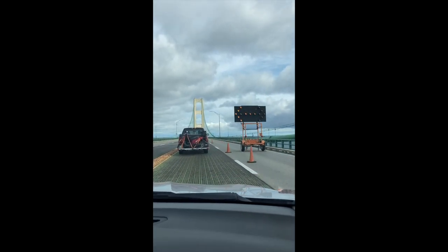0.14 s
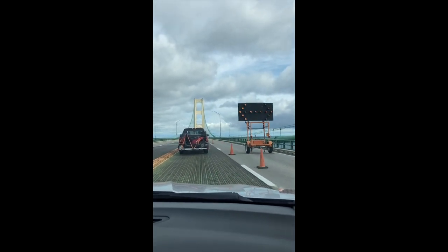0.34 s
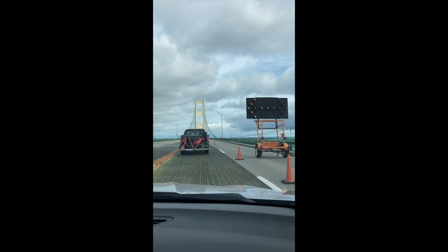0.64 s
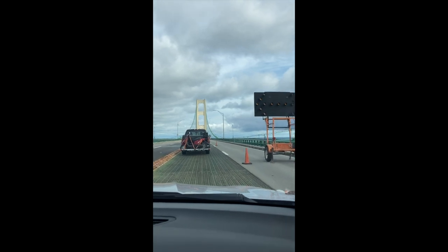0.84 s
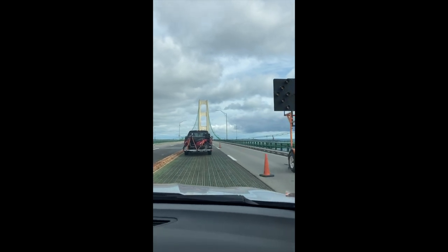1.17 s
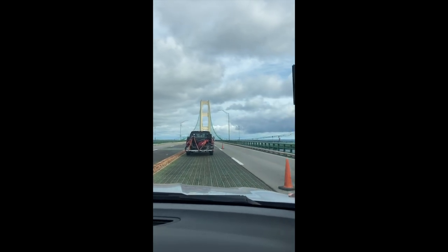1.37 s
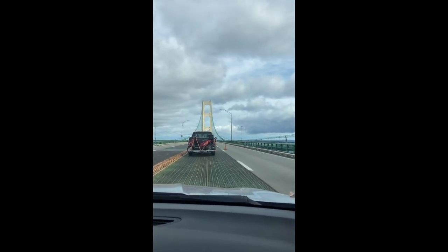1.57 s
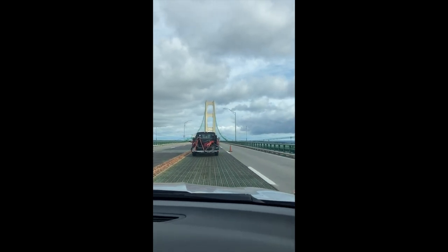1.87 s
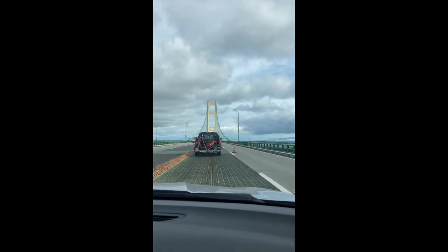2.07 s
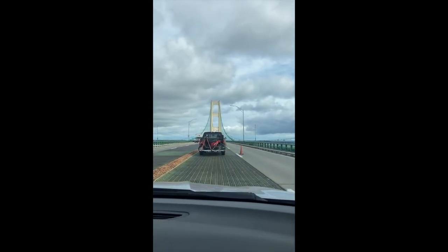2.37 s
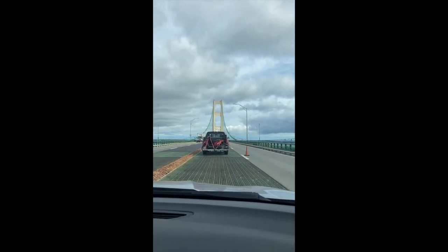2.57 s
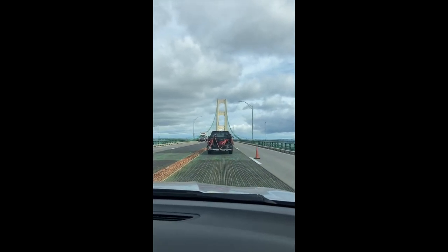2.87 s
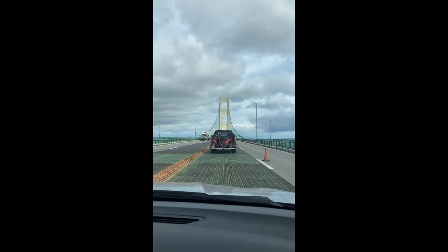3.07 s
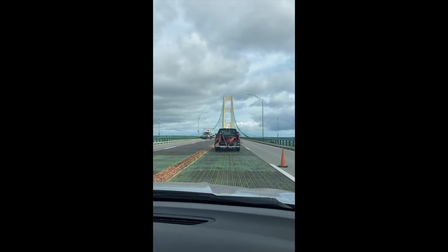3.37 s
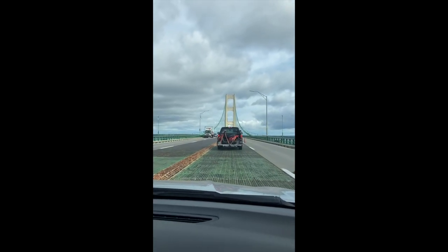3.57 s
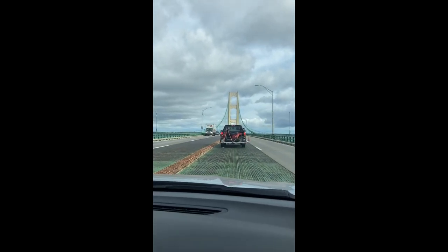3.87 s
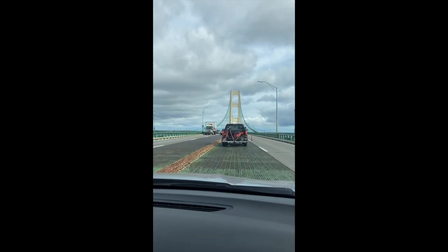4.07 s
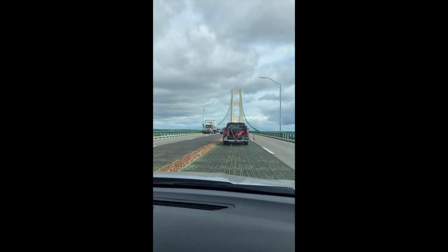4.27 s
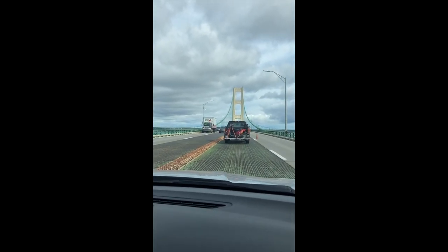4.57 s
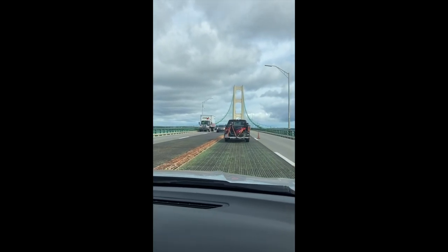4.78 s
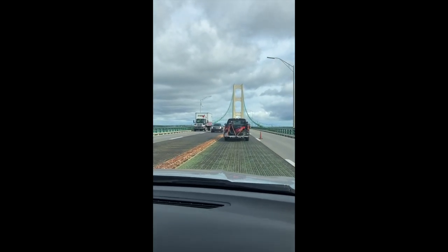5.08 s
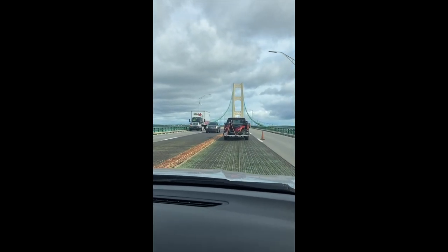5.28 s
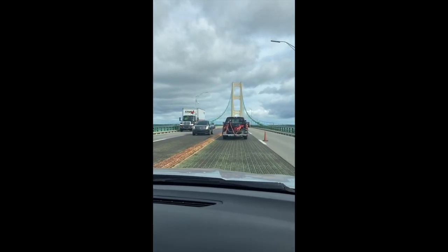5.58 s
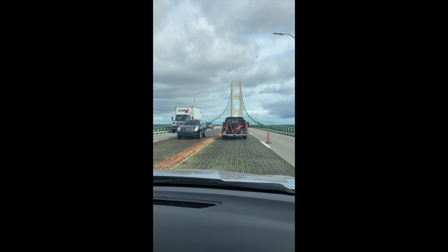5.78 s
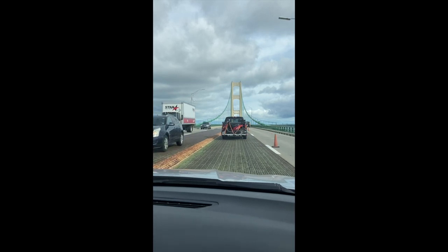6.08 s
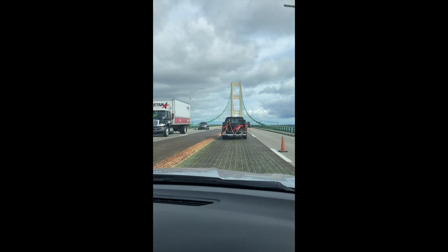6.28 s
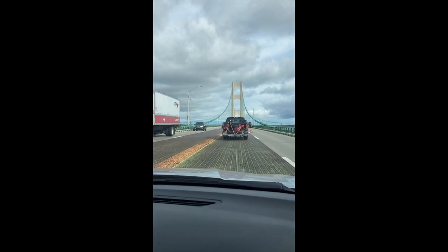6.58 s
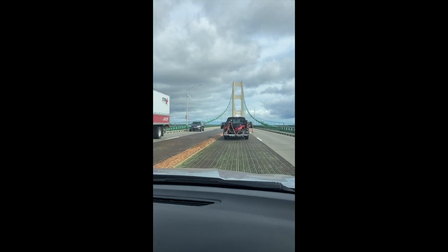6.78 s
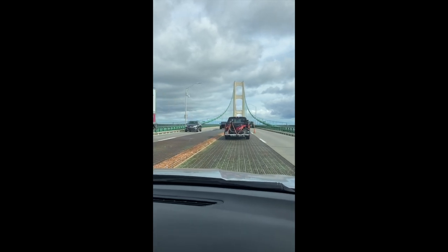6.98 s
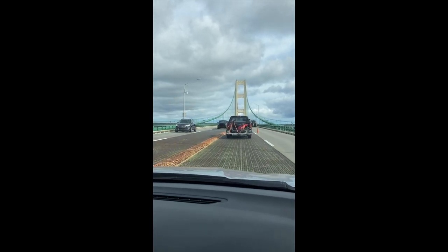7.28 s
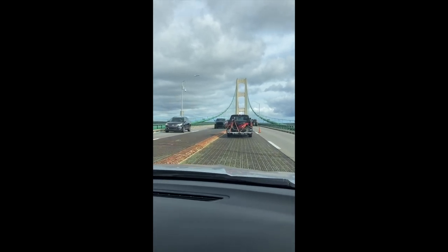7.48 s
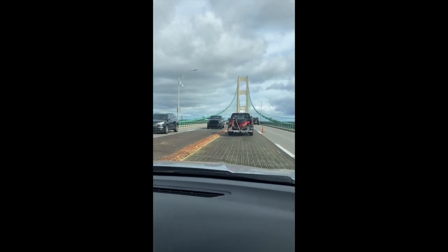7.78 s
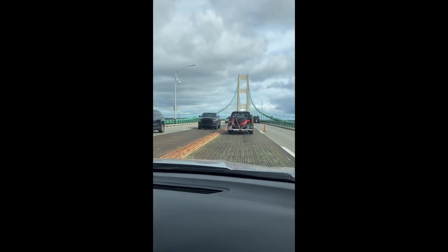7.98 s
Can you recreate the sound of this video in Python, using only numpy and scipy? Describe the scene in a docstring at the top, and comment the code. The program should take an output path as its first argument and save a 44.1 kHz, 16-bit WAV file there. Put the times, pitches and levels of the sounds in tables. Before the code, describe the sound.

A close cabin microphone catches a dominant bass drone from tires crossing a bridge's metal grid, wavering in strength and edging upward in pitch. Irregular joints cut small gaps followed by dull low thuds. Trim clicks sharply near the middle, and a very faint dash motor whine enters around four seconds. Later, oncoming traffic rushes by with a rough mid-range roar, while the hum continues to the end.

```python
"""A steady hum inside a car on an open steel grid deck: the tyres strike cross bars, so pitch follows speed.
Joints in the deck break the hum and thump; low noise booms in the cabin and tyre roar comes dulled.
Door seals hiss, trim ticks and rustles, and a small dash motor comes in as a steady whine.
Late on, oncoming traffic swells past as roar and rough tones. Harmonic sines make the hum and filtered
noise nearly all the rest."""
import sys
import numpy as np
from scipy import signal
from scipy.fft import rfft, irfft, next_fast_len
from scipy.io import wavfile

SR = 44100
rng = np.random.default_rng(int(sys.argv[2]) if len(sys.argv) > 2 else 0)


def unload_audio(sound):
    """Save the sound as a 16-bit wav file, at the path given as the first command line argument."""
    columns = np.transpose(np.atleast_2d(sound))
    # keep every value between -1 and 1, then stretch to whole-number steps
    steps = np.round(np.clip(columns, -1, 1) * 32767)
    wavfile.write(sys.argv[1], SR, steps.astype(np.int16))


N = 358974


def amp(db):
    """Decibel law: 20 dB is a tenfold amplitude."""
    return 10 ** (np.asarray(db) / 20)


def rms_one(x):
    """Normalisation of mean power: scale to rms 1."""
    return x / np.sqrt(np.mean(x ** 2) + 1e-20)


def in_time(rows):
    """Linear interpolation: each column of a curve table, one value a sample."""
    s, *columns = np.transpose(rows)
    return [np.interp(np.arange(N) / SR, s, c) for c in columns]


def over_log_hz(points, hz, **outside):
    """Interpolation on a log-frequency axis, as pitch is heard."""
    point_hz, values = np.transpose(points)
    return np.interp(np.log(hz), np.log(point_hz), values, **outside)


def drift(rate):
    """Low-passed noise: a random wander of rms 1, its double pole at rate Hz."""
    step = 40   # samples between drawn values
    r = np.exp(-2 * np.pi * rate * step / SR)
    white = rng.standard_normal(N // step + 2002)
    slow = signal.lfilter([1], [1, -2 * r, r * r], white)[2000:]   # drop the run-in
    return np.interp(np.arange(N) / step, np.arange(len(slow)), rms_one(slow))


def resonate(x, hz, width):
    """Two-pole resonance, gain 1 on top; width in Hz."""
    r = np.exp(-np.pi * width / SR)
    feedback = [1, -2 * r * np.cos(2 * np.pi * hz / SR), r * r]
    return signal.lfilter([(1 - r * r) / 2, 0, (r * r - 1) / 2], feedback, x)


def spread(gain):
    """Partial coherence: stereo noise of a given gain per frequency, summed from mid and side; rms 1."""
    # Left-right coherence. Each row: frequency in Hz, likeness from 0 to 1.
    likeness = [(60, .995), (125, .99), (200, .98), (290, .88), (400, .8), (560, .4), (750, .3), (1300, .1),
                (2400, .2), (4400, .12), (6000, .2), (8100, .85), (15000, .82)]
    # Stereo balance. Each row: frequency in Hz, left minus right in dB.
    balance = [(60, 1), (125, 1.1), (250, .4), (500, .2), (1000, -.7), (2000, .8), (8000, .5)]
    size = next_fast_len(N)
    hz = np.maximum(np.arange(size // 2 + 1) * SR / size, 1)
    alike = np.clip(over_log_hz(likeness, hz), 0, 1)
    lean_db = over_log_hz(balance, hz) / 2 * [[1], [-1]]
    mid, side = rfft(rng.standard_normal((2, size)))
    both = np.sqrt(1 + alike) * mid + np.sqrt(1 - alike) * side * [[1], [-1]]
    return rms_one(irfft(both * gain(hz) * amp(lean_db), size)[:, :N])


def coloured(spectrum):
    """Spectral shaping: stereo noise with a drawn spectrum, silent outside it; rms 1."""
    return spread(lambda hz: amp(over_log_hz(spectrum, hz, left=-150, right=-150)))


def mode_noise(hz, width):
    """Modal response: stereo noise through one resonance, width in Hz at half its peak gain; rms 1."""
    return spread(lambda f: 1 / (1 + ((f - hz) / (width / 2)) ** 2))


def patchy(x, edges_hz, patchy_db):
    """Band-wise modulation: each band surges on its own, slowly and in flickers, and partly with the others."""
    size = next_fast_len(N)
    together, out, spectrum = drift(8.1), 0, rfft(x, size)
    hz = np.arange(spectrum.shape[1]) * SR / size
    for low, high in zip(edges_hz, edges_hz[1:]):
        part = irfft(spectrum * ((hz >= low) & (hz < high)), size)[:, :N]
        surge = .6 * together + .6 * drift(1.5) + .8 * drift(9)
        out = out + part * amp(patchy_db * surge)
    return out


def joints(column, half_s, late_s):
    """Transient disturbance: a bell-shaped change in dB at every joint, half_s wide on each side to 1/e."""
    # Joints between deck panels. Each row: time in seconds, hum lost in dB, low rumble gained in dB.
    panel_joints = np.array([(.19, 0.5, 0), (.43, 11.5, 1.5), (.7, 0, 5.5), (1.67, 15.5, 8), (2.06, 6, 7),
                             (2.771, 16.5, 3.5), (2.89, 19, 3.5), (3.04, 5.5, 3), (3.27, 4.5, 6),
                             (4.07, 5.5, 2), (4.34, 16.5, 3), (5.11, 3, 3), (5.43, 6, 6), (5.701, 4, 4),
                             (5.88, 10.5, 1.5), (6.17, 4, 0.5), (6.509, 4.5, 4), (7.031, 9.5, 6.5),
                             (7.33, 4.5, 4), (7.46, 1.5, 2), (7.859, 9, 2)])
    t = np.arange(0, N + 64, 64) / SR
    bells = np.exp(-((t - panel_joints[:, :1] - late_s) / half_s) ** 2)
    return np.interp(np.arange(N) / SR, t, panel_joints[:, column] @ bells)


def grid_hum():
    """Periodic impacts give a harmonic tone at the bar rate; it swells, dips and wanders in phase."""
    # Speed over the deck. Each row: time in seconds, bars struck per second.
    speed = [(0.0, 113), (0.43, 112.7), (0.54, 113.7), (0.84, 115.2), (1.45, 119.4), (1.68, 120.4),
             (1.97, 122), (2.04, 124.4), (2.7, 125.8), (2.79, 128), (5.3, 129), (5.69, 127.7),
             (6.89, 125.7), (6.96, 127.3), (7.82, 127.3), (7.93, 132), (8.09, 127), (8.14, 131.0)]
    # Hum level as the four tyres drift in and out of step. Each row: time in seconds, level in dB.
    hum_level = [(0, -15), (.33, -16.5), (.5, -19.5), (.8, -12.5), (1.1, -13.5), (1.55, -17.5),
                 (1.9, -13.5), (2.27, -13.5), (2.45, -17.5), (2.65, -16), (2.95, -17), (3.25, -16.5),
                 (3.48, -13), (3.9, -15), (4.3, -17), (4.6, -13.5), (5.0, -16), (5.6, -13), (5.8, -14.5),
                 (5.93, -21), (6.4, -15.5), (6.6, -16), (6.9, -11.5), (7.05, -19.5), (7.2, -17.5),
                 (7.4, -19.5), (7.75, -16), (8.14, -15)]
    # Octave, strong at first while it meets a floor pan mode. Each row: time in seconds, level in dB.
    octave_level = [(0, -31), (.09, -29.5), (.24, -31), (.34, -36), (.45, -28), (.52, -31), (.62, -37),
                    (.68, -35), (.75, -29.5), (.83, -36), (.93, -34.5), (1.08, -39), (1.2, -52), (1.5, -48),
                    (1.75, -38), (2.3, -44), (2.65, -39.5), (3.4, -48), (3.9, -50), (4.1, -39),
                    (4.3, -51.5), (4.6, -37.5), (4.9, -50.5), (5.5, -44.5), (5.9, -38.5), (6.5, -39),
                    (7.3, -44.5), (8.14, -45.5)]
    # Higher harmonics. Each row: time in seconds, third harmonic in dB, fourth harmonic in dB.
    overtones = [(0, -50, -54), (.3, -46, -49), (.55, -52, -55), (1, -51.5, -53.5), (2, -53, -52),
                 (3, -52.5, -54), (4, -51, -54.5), (5, -53, -54.5), (5.5, -52, -53), (5.9, -52, -47),
                 (6.3, -52, -51), (7, -49.5, -55), (8.14, -50, -59)]
    # Where the hum seems to lie. Each row: time in seconds, left lead of the fundamental in radians,
    # left minus right in dB.
    hum_side = [(0, -.05, 1.1), (.75, .03, 1.2), (1.75, -.01, 1.6), (2.25, -.07, 1), (2.75, -.05, .7),
                (3.25, -.07, .5), (3.75, -.06, .9), (4.25, -.1, 1.5), (4.75, -.07, 1.5), (5.75, -.02, .7),
                (6.25, -.06, .9), (6.75, -.01, 1.3), (7.25, -.09, .8), (8.14, -.02, .8)]
    rate, = in_time(speed)
    phase = 2 * np.pi * np.cumsum(rate) / SR + .14 * drift(6)
    lead, lean_db = in_time(hum_side)
    lag = np.array([[.5], [-.5]]) * lead   # the two sides hear it a little apart
    hum_db = in_time(hum_level)[0] - joints(column=1, half_s=.027, late_s=0)
    out = amp(hum_db + .57 * drift(22)) * np.sin(phase + lag)
    second = np.sin(2 * phase + .6 * drift(4) + 3 * lag)
    out += amp(in_time(octave_level)[0] + 1.2 * drift(11)) * second
    for k, db in zip((3, 4), in_time(overtones)):
        harmonic = np.sin(k * phase + 1.1 * drift(5) + k * lag)
        out += amp(db + 3 * drift(3)) * harmonic
    return np.sqrt(2) * out * amp(lean_db * [[.5], [-.5]])   # root 2: a sine of rms 1


def road():
    """Broadband rolling noise: rumble, roar and tread noise of the deck, lifted by thumps at the joints."""
    # Spectra of rumble, roar and tread noise through the glass.
    # Each row: frequency in Hz, relative level per Hz in dB.
    rumble_spectrum = [(18, -39.5), (28, -19), (38, -4), (50, 2), (64, -1.5), (85, -2.5), (102, -9.5),
                       (127, -6), (145, -11.5), (170, -20), (230, -34.5), (400, -63)]
    roar_spectrum = [(110, -19.5), (160, 2), (215, -5), (260, -7.5), (310, -11), (390, -16), (460, -14),
                     (560, -13), (620, -18), (700, -22.5), (800, -35.5), (1000, -51)]
    tread_spectrum = [(600, -17.5), (800, -1), (1000, -4), (1380, -7), (1500, -10.5), (2300, -43.5)]
    # Road level. Each row: time in seconds, rumble in dB, roar in dB.
    deck_level = [(0, -22.5, -34.5), (1.0, -22.5, -34.5), (1.8, -20, -34.5), (2.3, -24, -35),
                  (3.0, -22, -35), (3.6, -24, -36.5), (4.4, -20, -35.5), (5.3, -24, -36), (6.3, -24, -34),
                  (6.6, -23, -32), (7.1, -20.5, -35.5), (8.14, -20.5, -34)]
    # Tread noise level. Each row: time in seconds, level in dB.
    tread_level = [(0, -60.5), (1.0, -60.5), (2.4, -61), (3.6, -60), (4.4, -57.5), (5.0, -58), (5.4, -61),
                   (6.0, -62), (6.9, -60.5), (7.3, -55.5), (8.14, -56.5)]
    thump_top_hz, roar_share = 94.5, .2   # top of the lifted rumble; share of the thump's dB given to the roar
    rumble_db, roar_db = in_time(deck_level)
    rumble = amp(rumble_db) * coloured(rumble_spectrum)
    deep = signal.sosfiltfilt(signal.butter(4, thump_top_hz, fs=SR, output="sos"), rumble)
    thump_db = joints(column=2, half_s=.043, late_s=.056)   # the thump follows the gap in the hum
    rumble += deep * (amp(thump_db) - 1)
    roar = patchy(coloured(roar_spectrum), [0, 190, 300, 420, 600, 1100], patchy_db=1.1)
    roar_db = roar_db + roar_share * (thump_db - thump_db.mean())
    tread = patchy(coloured(tread_spectrum), [500, 1100, 1500, 2500], patchy_db=1.7)
    return rumble + amp(roar_db) * roar + amp(in_time(tread_level)[0]) * tread


def cabin_modes():
    """Modal resonance: noise stands out in bands at the modes of the cabin, its glass and its trim."""
    # Panel and air modes, then faint resonances of glass and trim.
    # Each row: frequency in Hz, width in Hz, mid level in dB.
    cabin = [(51, 6.7, -37.5), (81.2, 13, -29), (91.2, 21, -26), (164, 39, -41.5), (207.4, 6, -43),
             (218, 24, -46), (340.5, 27, -49), (512, 44, -51), (1347, 90, -70.5)]
    glass = [(1741, 12, -78), (1830, 90, -78), (2030, 90, -81), (2310, 100, -85), (2725, 30, -88),
             (2860, 70, -87), (3256, 70, -92)]
    out = np.zeros((2, N))
    for hz, width, db in cabin + glass:
        out += amp(db + 1.2 * drift(2.5)) * mode_noise(hz, width)
    return out


def panel_buzz():
    """Single-mode panel resonance: a narrow band of noise, stronger in the first half."""
    # Buzz level. Each row: time in seconds, level in dB.
    panel_level = [(0, -46.5), (1.0, -49), (2.2, -45), (4.4, -54.5), (6.4, -52), (8.14, -56)]
    return amp(in_time(panel_level)[0] + 1.2 * drift(3)) * mode_noise(hz=462, width=34)


def seal_hiss():
    """Turbulent air noise at the door seals: treble noise that follows the wind load and flickers by band."""
    # Hiss spectrum. Each row: frequency in Hz, relative level per Hz in dB.
    air_spectrum = [(1100, -20), (1500, -2), (2050, -2), (2400, -9), (3000, -12), (3900, -18), (4700, -23),
                    (5400, -32), (6500, -31.5), (8500, -27), (10400, -28), (11500, -38), (14000, -34),
                    (15600, -39)]
    # Wind load on glass and seals. Each row: time in seconds, change of level in dB.
    gust = [(0, 1), (.5, 1), (1.2, -.5), (2.4, -.5), (4.3, .5), (4.6, 3), (5.15, 2.5), (5.4, 0), (6.3, 0),
            (6.8, 4), (7.25, 4), (7.45, 1.5), (8.14, 1)]
    edges_hz = [1000, 1800, 2600, 3800, 5500, 8000, 16000]
    return amp(-69.5 + in_time(gust)[0]) * patchy(coloured(air_spectrum), edges_hz, patchy_db=1.1)


def trim():
    """Impact excitation: a snap sets two broad plastic rings going, with a rattling tail and a treble sizzle."""
    # Ticks. Each row: start in seconds, peak of the rings in dB, low ring in Hz, high ring in Hz,
    # high ring gain against low in dB, rattle tail against snap in dB, sizzle in dB, sizzle centre in Hz.
    ticks = [(1.462, -53, 1600, 4300, -7, -10.5, -90, 9000), (1.696, -64, 3199, 3400, -6, -6.5, -84, 9000),
             (1.718, -70, 4600, 9000, -0.5, -12, -79, 9500), (1.727, -63, 2800, 4300, 0, -8, -81, 9000),
             (4.587, -46, 1600, 2600, -1, -13.5, -69, 9000), (4.589, -51, 2300, 3700, 1, -7, -78, 14500),
             (4.703, -54.5, 1900, 3200, -2, -5.5, -71, 9300), (5.18, -65, 3810, 4370, -1.5, -8, -86, 9000),
             (5.418, -59, 1900, 3100, -0.5, 0, -84, 9000), (6.808, -74, 3000, 7000, 0, -10, -80.5, 11000),
             (6.827, -46.5, 4300, 6200, 5, -9, -63.5, 12000)]
    snap_s, tail_s, ring_width = .0028, .014, .35   # decay times; width of each stage as a share of pitch
    rise_s, sizzle_tail_s = .002, .008
    out, t = np.zeros((2, N)), np.arange(4000) / SR
    above = signal.butter(3, 7000, "high", fs=SR, output="sos")
    fizz = (1 - np.exp(-t / rise_s)) * np.exp(-t / sizzle_tail_s)

    def ring(x, hz):
        """Two equal resonances in cascade, scaled down as pitch rises."""
        once = resonate(x, hz, ring_width * hz)
        return resonate(once, hz, ring_width * hz) / np.sqrt(hz / 3000)

    for s, db, low_hz, high_hz, high_db, tail_db, sizzle_db, sizzle_hz in ticks:
        shared, left, right, fine = rng.standard_normal((4, len(t)))
        sides = np.array([left, right])
        rattle = amp(tail_db) * sides * np.exp(-t / tail_s)
        snap = shared * np.exp(-t / snap_s) + rattle + 3 * (t == 0)   # the last term is the contact itself
        tick = ring(snap, low_hz) + amp(high_db) * ring(snap, high_hz)
        treble = resonate(fine + .5 * sides, sizzle_hz, .5 * sizzle_hz)
        sizzle = rms_one(signal.sosfilt(above, treble)) * fizz / fizz.max()
        at = round(s * SR)
        out[:, at:at + len(t)] += amp(db) * tick / np.abs(tick).max() + amp(sizzle_db) * sizzle
    return out


def rustles():
    """Band-limited noise under a Gaussian envelope: soft puffs of treble."""
    # Brief rustles. Each row: centre time in seconds, length in seconds (down by about 14 dB at its ends),
    # level in dB, centre in Hz, width of each of two filter stages in Hz.
    puffs = [(2.04, 0.055, -75.5, 3540, 1510), (5.893, 0.094, -72.5, 3630, 1000),
             (6.63, 0.084, -78.5, 6899, 7000), (7.949, 0.12, -69, 4120, 2180),
             (7.953, 0.094, -66.5, 8610, 4480)]
    out, t = np.zeros((2, N)), np.arange(N) / SR
    noise = rng.standard_normal((2, N))
    for s, length, db, hz, width in puffs:
        swell = np.exp(-(2.5 * (t - s) / length) ** 2)
        out += amp(db) * rms_one(resonate(resonate(noise, hz, width), hz, width)) * swell
    return out


def dash_motor():
    """Pure tone of a small motor in the dash: a sine that fades in at fixed pitch, its sides out of phase."""
    t, whine_hz, from_s, rise_s = np.arange(N) / SR, 966.7, 3.95, .06
    fade_in = 1 / (1 + np.exp((from_s - t) / rise_s))
    tone = np.sin(2 * np.pi * whine_hz * t + np.array([[0], [2.2]]))
    return np.sqrt(2) * amp(-63.5 + drift(2)) * fade_in * tone


def traffic():
    """Doppler shift of a passing source: a swell of roar with rough tyre hums that drop in pitch."""
    # Oncoming traffic. Each row: time in seconds, relative level in dB, main tyre hum in Hz.
    passing = [(5.2, -78, 590), (5.7, -54, 585), (5.95, -46.5, 575), (6.1, -48.5, 570), (6.2, -44.5, 565),
               (6.35, -41.5, 556), (6.5, -42, 550), (6.6, -44, 538), (6.68, -48, 538), (6.78, -44.5, 540),
               (6.95, -52, 531.5), (7.2, -54, 534), (7.8, -76, 526)]
    # Roar spectrum. Each row: frequency in Hz, relative level per Hz in dB.
    body_spectrum = [(200, -25.5), (280, -0.5), (400, -9.5), (570, 3), (700, -12), (850, -14), (1100, -18),
                     (1800, -36.5), (2600, -45.5), (4000, -80)]
    db, hz = in_time(passing)
    out, turn = coloured(body_spectrum), 2 * np.pi * np.cumsum(hz) / SR
    roughness = signal.butter(3, 16, fs=SR, output="sos")   # each hum spreads 16 Hz to either side
    for share, hum_db in [(1.5, -15), (1.27, -11), (1, 3), (.5, -4)]:   # multiple of the main hum, level
        band = signal.sosfilt(roughness, rng.standard_normal((2, 2, N)))
        hum = band[0] * np.cos(share * turn) + band[1] * np.sin(share * turn)
        out += amp(hum_db) * rms_one(hum)
    near = (np.arange(N) > passing[0][0] * SR) & (np.arange(N) < passing[-1][0] * SR)
    return near * amp(db) * out


def scene():
    """Superposition of all sources in the cabin."""
    steady = grid_hum() + road() + cabin_modes() + panel_buzz() + seal_hiss()
    return steady + trim() + rustles() + dash_motor() + traffic()


def record(dry):
    """Amplitude modulation: the bass rides an electrical carrier as faint high sidebands; the top is cut."""
    carrier_hz, cutoff_hz = 11013.6, 15700
    bass = signal.sosfilt(signal.butter(2, [95, 200], "band", fs=SR, output="sos"), dry.mean(axis=0))
    riding = amp(-63.5) * np.cos(2 * np.pi * carrier_hz * np.arange(N) / SR) * bass
    return signal.sosfilt(signal.cheby2(16, 70, cutoff_hz, fs=SR, output="sos"), dry + riding)


dry = scene()
out = record(dry)
unload_audio(out)
```